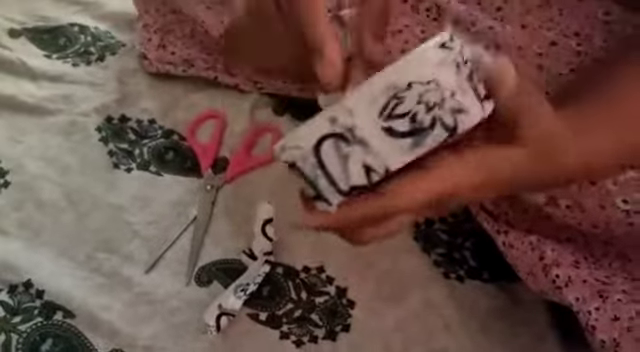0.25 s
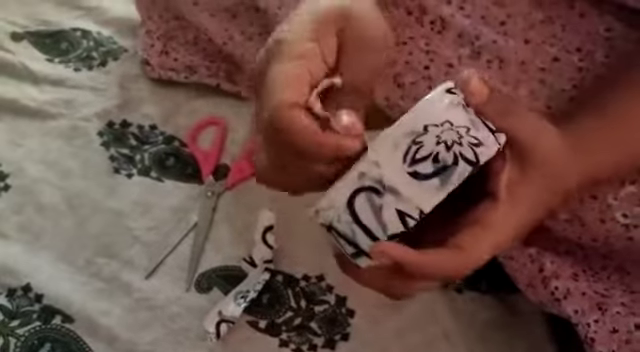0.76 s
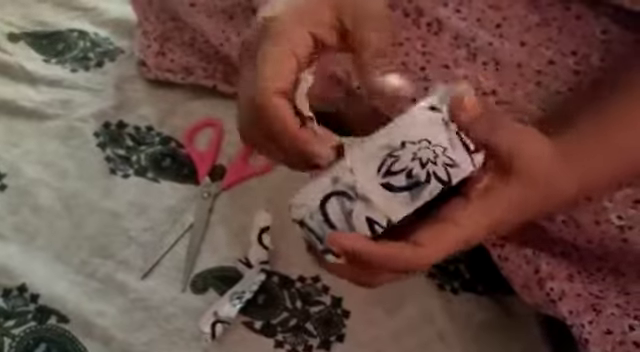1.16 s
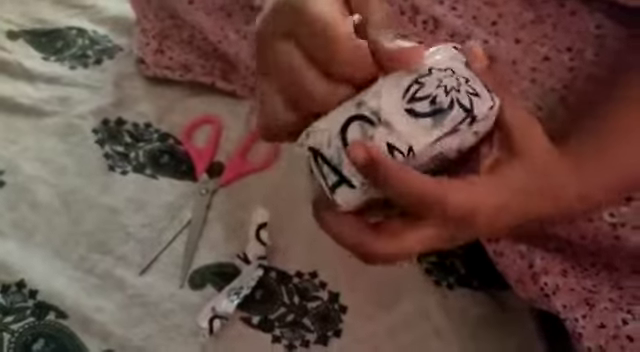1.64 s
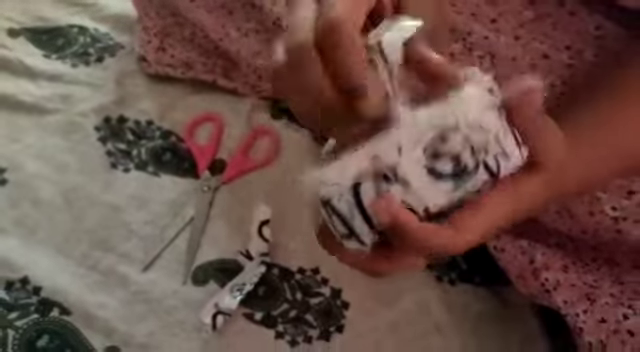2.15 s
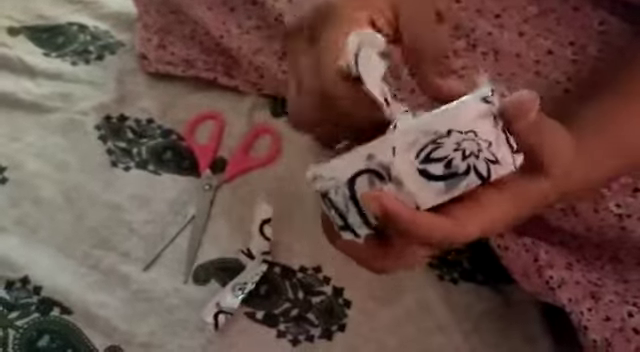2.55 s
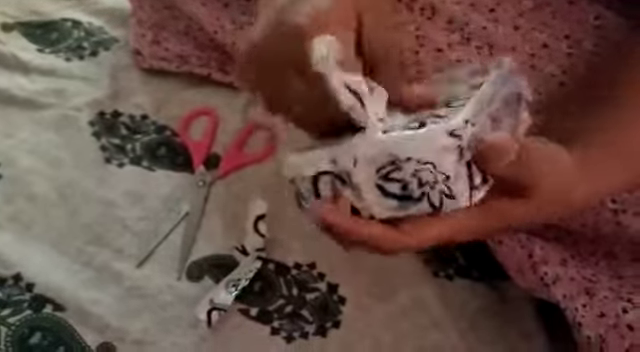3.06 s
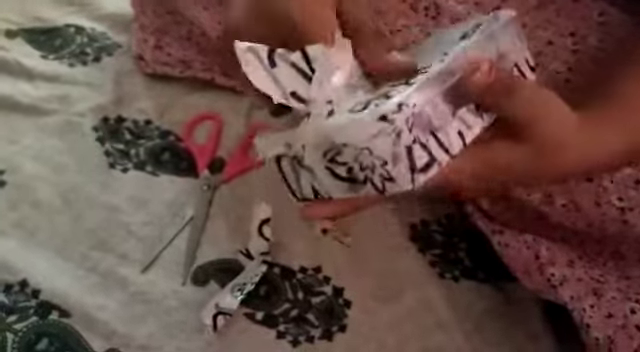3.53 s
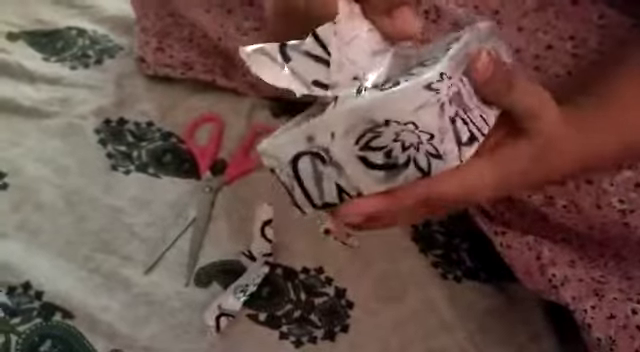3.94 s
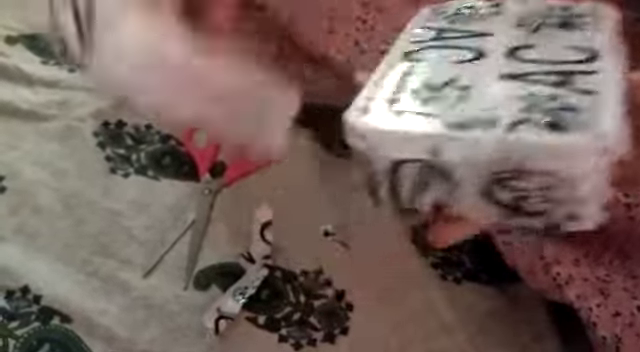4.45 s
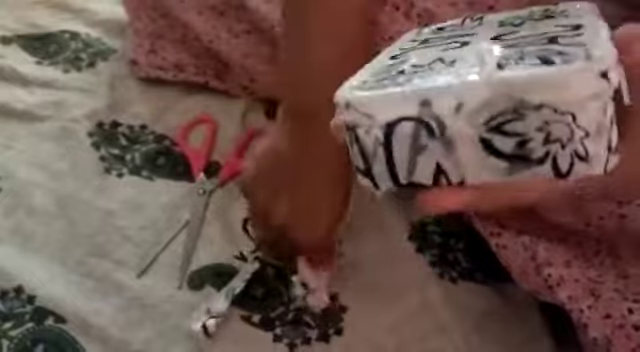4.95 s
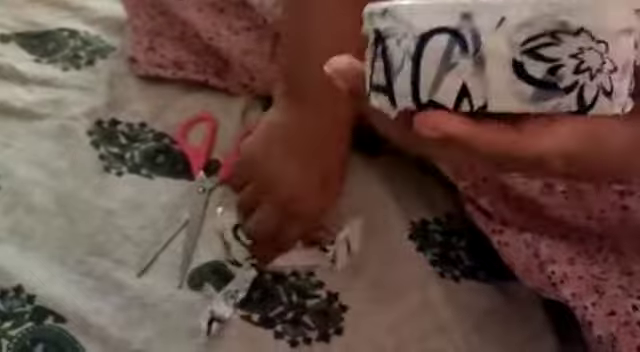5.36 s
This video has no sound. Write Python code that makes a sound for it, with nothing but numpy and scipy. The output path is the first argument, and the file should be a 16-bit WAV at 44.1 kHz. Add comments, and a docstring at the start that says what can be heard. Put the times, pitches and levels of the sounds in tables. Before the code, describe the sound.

A phone very close to the hands picks up stiff wrapping paper being torn from a small hollow box in a soft, quiet room. From 0 to 0.6 s there are only faint finger rubs, tiny creaks and soft hollow taps. Crisp snaps build from about 0.6 s into a loud crackling rip at 0.7-0.95 s, with blunt pressure pops stronger on the right. Quiet rubbing and small ticks follow from 1 to 2.4 s, with a barely audible thin whistle near 1.3-1.9 s. A single pop comes at 2.5 s, then a short, hard rip at 2.6-2.7 s. Light fumbling and dull knocks continue to 3.6 s. The longest burst, dense and bright, runs from 3.67 to 4.12 s, ending in its sharpest tear. After that, sparse ticks and gentle rustles, a little rub around 4.8-5.2 s, and low flickering room hiss to about 5.6 s.

```python
"""Paper wrap of a small box, picked at and torn by hand, close under a phone in a soft furnished room.
Creases, fibres and sliding fingers are noise bursts in the paper and knocks on the modes of the box.
Pressed panels ring as decaying sines; flips of the sheet are pressure jumps at the right port,
and the bass cut of the phone rings after them. Wall echoes and a short noise tail follow the paper;
below lie faint wavering tones and a quiet room noise that the phone's noise suppressor makes flicker."""
import sys
import numpy as np
from scipy import signal
from scipy.fft import rfft, irfft, next_fast_len
from scipy.io import wavfile

SR = 44100
rng = np.random.default_rng(int(sys.argv[2]) if len(sys.argv) > 2 else 0)


def transcribe(u):
    """Save the signal u as a 16-bit wav file named by the first command-line argument.

    u: samples, shape (n,) or (channels, n), limited to [-1, 1]; the rate is SR.
    q: integer samples, one column per channel.
    """
    v = np.clip(np.atleast_2d(u).T, -1, 1)
    q = np.round(v * 32767).astype(np.int16)
    wavfile.write(sys.argv[1], SR, q)


N = 246959

# crease snaps, burst energy: (time [s], treble left [dB], treble right [dB], box boom [dB])
SNAPS = [(.1277, -22, -14, -49), (.3279, -48, -48, -13.5), (.3881, -29, -25.5, -23), (.427, -26, -26, -30),
         (.5738, -16.5, -9.5, -16.5), (.6001, -5, -9, -17.5), (.696, -0.5, 1.5, -27),
         (.7032, -31.5, -16, -5), (.7239, -13, -0.5, -14), (.7363, 6, 6, -4.5), (.8136, 11, 9, -1.5),
         (.8165, -9, -13, -5.5), (.8799, 7, 4.5, 11.5), (.9031, 17, 3, 15.5), (.9181, -10, -16, 14),
         (.9304, 1, -15, 12), (1.1378, -15, -16.5, -37), (1.1472, -13.5, -19, -27), (1.2148, -9, -15, -13),
         (1.2274, -12.5, -23, -17), (1.3838, -14, -8, -29), (1.4353, -11.5, -10, -30),
         (1.6435, -22.5, -26, -23.5), (1.7, -28, -31, -13), (1.858, -28, -22.5, -48),
         (1.9472, -14, -12.5, -37), (2.073, -29, -13.5, -9), (2.1729, -18, -8.5, -48),
         (2.2221, -34, -24, -12.5), (2.2518, -18, -19, -17.5), (2.4921, -1, 4.5, -5),
         (2.5809, -14.5, -14, -16), (2.6163, -10, -20, -24.5), (2.6222, 4.5, 7, -3), (2.6319, -11, -5, -5),
         (2.6575, 6.5, 6.5, 14), (2.666, 13.5, -13, 5.5), (2.6685, 7, 4, 4), (2.6833, 10, 1, -1),
         (2.797, -29, -42, -13), (2.8585, -20, -18, -27), (2.9022, -16.5, -7, -11),
         (2.9101, -32, -13.5, -3.5), (2.934, -43, -40, -20), (3.1394, -21.5, -16.5, -24),
         (3.453, -17, -12.5, -8), (3.5007, -46, -45, -11.5), (3.5519, -46, -44, -12), (3.6, -25, -27, -17),
         (3.6664, -12.5, -10, -24), (3.6877, 5.5, 6, 8), (3.6987, 10, 6, 6), (3.712, -11.5, 16.5, 2),
         (3.7158, 7.5, -0.5, 6), (3.7199, 9.5, -6, -16.5), (3.7295, -3, -3, -17.5), (3.7909, 9, 5.5, 1),
         (3.8389, 4.5, 9, 3), (3.8538, 2, 2, -27.5), (3.8663, 1.5, 5, -17.5), (3.8733, -2.5, -4, -17.5),
         (3.9115, 2, 1, -8), (3.9459, -1, -6, -9.5), (3.9626, -7.5, 2, -7.5), (3.9798, -4.5, 0, -10.5),
         (4.032, 0, 7, -9), (4.056, -15, 5.5, -6), (4.0958, 9.5, 9.5, 7.5), (4.0979, 13, 3, 15.5),
         (4.104, -4, -2.5, -6), (4.11, 16, 2, 14), (4.1183, 13.5, -4.5, 9), (4.2488, -14, -6.5, -13.5),
         (4.3554, -33, -24.5, -35), (4.7818, -19, -17.5, -19), (4.8297, -44, -23, -10.5),
         (5.1824, -12.5, -19, -6.5), (5.5045, -29.5, -35, -23)]
# runs of tearing fibres, energy of a usual break: (start [s], end [s], treble left [dB],
# treble right [dB], box boom [dB], mids over their usual share [dB])
RIPS = [(0.89, 0.93, -28, -39, -19, -14), (2.615, 2.639, -29, -9.5, -6.5, -8.5),
        (2.658, 2.672, -5.5, -12, -6, 7), (2.897, 2.944, -57, -55, -21, 3),
        (3.698, 3.727, -2, -10, -3, 3.5), (4.095, 4.12, 7.5, -8.5, 4, 8)]
# sheet flips at the right port, before the bass cut:
# (time [s], pressure jump [full scale 1, sign = direction], loading time [ms])
FLIPS = [(.7369, 0.93, 2), (0.8168, 0.79, 1.5), (.88, -0.32, 0.78), (0.9037, 0.66, 1.1), (.906, .5, 0.36),
         (0.9184, 0.22, 1.7), (0.9308, -0.21, 0.89), (2.4932, 1.12, 1.13), (2.6595, -0.73, 2.6),
         (2.6687, 1.54, 0.53), (3.7, 0.12, 1.2), (3.7033, -0.89, 1.7), (3.7075, 1, 1.7),
         (3.7159, 0.67, 1.8), (3.7194, -0.32, 1.3), (3.729, -0.69, 1.1), (3.793, -0.73, 1.9),
         (3.839, 0.89, 2.8), (3.8541, .55, 1.1), (3.8664, .35, 0.73), (3.912, 0.16, 1.7),
         (4.0966, .95, 0.55), (4.104, .75, 4.9), (4.108, -0.55, 0.97), (4.1111, 0.5, 1.4),
         (4.12, 0.74, 0.46), (4.1232, -0.41, 1.2)]
# fingers sliding on paper, energy of a usual creak: (time [s], treble rustle [dB], low rub [dB])
RUSTLE = [(0, -47, -33.5), (.2, -39, -36), (.44, -51.5, -39), (.6, -37, -34.5), (1.05, -48, -45),
          (1.35, -42, -34), (1.46, -41, -28), (1.55, -44.5, -27.5), (1.7, -39, -41), (1.9, -59.5, -58),
          (2.149, -38.5, -29.5), (2.4, -44.5, -36), (2.85, -42, -42), (3.08, -39, -29),
          (3.321, -48.5, -55.5), (3.45, -42.5, -35.5), (3.9, -44, -40), (4.3, -39.5, -33), (4.56, -64, -53),
          (4.85, -37, -29.5), (5.34, -58.5, -45), (5.471, -52, -38), (5.6, -43, -35.5)]
# finger pads press a box panel: (time [s], peak before the ports [dB], panel pitch [Hz])
PRESSES = [(.134, -51.5, 466), (.325, -45, 666), (1.384, -51, 423), (1.447, -55, 406), (1.479, -47, 407),
           (1.511, -49, 465), (1.553, -47.5, 374), (2.124, -46, 300), (2.247, -50.5, 436),
           (2.934, -53, 700)]
# lid and cavity modes: (frequency [Hz], width [Hz], left [dB], right [dB])
BOX_MODES = [(166.4, 270, -6, -16.5), (324, 83, -10, -14.5), (416, 132, -1, -5), (603, 89, -1.5, -8),
             (708, 103, 0.5, -8.5), (940, 150, -7, -5.5)]
# colour of the two ports: (frequency [Hz], left [dB], right [dB])
PORTS = [(208, 4, 3), (725, 4, -0.5), (887, -0.5, -0.5), (1130, -8, -7.5), (1690, -2.5, -6), (2650, 4, -3),
         (3150, 2.5, -3), (4110, 5, -0.5), (5010, -4.5, -7.5), (5690, 2.5, 0), (6540, 9.5, 2.5),
         (6820, 4, 5), (7565, 1, 12.5), (8144, -25, -11.5)]
# hum spectrum before the ports: (frequency [Hz], relative density [dB per Hz], left-right likeness [0-1])
HUM = [(30, -8.5, 0.5), (58, 3, 0.6), (106, 2, 0.7), (149, 2.5, 0.98), (202, -5, 0.9), (430, 2, 1),
       (740, -12, 0.51), (1000, -9, 0), (1960, -11.5, .05), (2960, -17.5, 0.3), (3200, -14, 0.6),
       (4100, -19, .1), (5100, -12.5, 0.14), (7870, -20.5, 0.5)]
# faint wavering tones: (frequency [Hz], middle level [dB])
WHINES = [(1880, -79), (2600, -82.5), (3391, -76), (3800, -82.5)]
# thin tone that comes and goes: (time [s], middle level [dB])
WHISTLE = [(1.2, -120), (1.31, -67), (1.7, -72), (1.9, -82), (2.0, -120)]
# nearby walls: (delay [s], left [dB], right [dB])
ECHOES = [(.0085, -15, -23.5), (0.019, -23, -31.5), (.027, -21, -24.5)]
# noise tail of box boom, sheet mids, treble in turn: (t60 [s], left [dB], right [dB])
TAIL = [(0.35, -17.5, -19.5), (0.28, -11, -11.5), (0.22, -9, -19.5)]

HUM_DB, WHISTLE_HZ = -59.5, 4603
SHEET_HZ, TREBLE_HZ = (1100, 4700), (4700, 9000)
LOW_CUT_HZ, TOP_HZ = 106.25, 8000
MIDS_FROM_TREBLE, MIDS_DB = 0.57, -9  # sheet mids lie between treble and boom in dB, then this offset
RIPS_PER_S, CREAKS_PER_S, TICKS_PER_S = 1100, 640, 7.9
TICK_OVER_DB = 19.5  # ticks over creaks, treble only


def undb(db):
    """Amplitude of a dB level."""
    return 10 ** (np.asarray(db) / 20)


def band(x, edges_hz, order=3):
    """Steep band-pass."""
    sos = signal.butter(order, edges_hz, "bandpass", fs=SR, output="sos")
    return signal.sosfilt(sos, x)


def on_log_axis(points_hz, values, size):
    """Table values at the bins of a transform, joined over log frequency."""
    bins_hz = np.fft.rfftfreq(size, 1 / SR)
    return np.interp(np.log(bins_hz + 1), np.log(points_hz), values)


def causal(points_hz, db, size=1024):
    """Minimum-phase response of a dB curve, by folding its cepstrum."""
    cepstrum = irfft(on_log_axis(points_hz, db, size) * np.log(10) / 20)
    cepstrum[1:size // 2] *= 2
    cepstrum[size // 2 + 1:] = 0
    return irfft(np.exp(rfft(cepstrum)))


def walk(points_per_s, count=400):
    """Random levels of unit spread joined by straight lines."""
    return np.interp(np.arange(N) / SR * points_per_s, np.arange(count), rng.standard_normal(count))


def unit_energy(x):
    """Scale each row to energy 1."""
    return x / np.sqrt(np.sum(x ** 2, axis=1))[:, None]


def start_samples(s):
    """Sample index of each time, held inside the scene."""
    return np.clip((s * SR).astype(int), 0, N - 1)


def bursts(s, db, decay_s, rise_s=0.00038, size=512):
    """A short noise burst of fixed energy at each time."""
    t = np.arange(size) / SR
    envelope = np.exp(-t / decay_s) * (1 - np.exp(-t / rise_s))
    noise = unit_energy(rng.standard_normal((len(s), size)) * envelope)
    out = np.zeros(N + size)
    np.add.at(out, start_samples(s)[:, None] + np.arange(size), noise * undb(db)[:, None])
    return out[:N]


def knocks(s, db):
    """One push or pull on the box at each time."""
    out = np.zeros(N)
    np.add.at(out, start_samples(s), undb(db) * np.sign(rng.standard_normal(len(s))))
    return out


def crackle(per_s, scatter_db, count):
    """Break times with random waits, and skewed sizes in dB: a few far above the rest, capped."""
    wait, size = -np.log(rng.random((count, 2))).T
    return np.cumsum(wait) / per_s, scatter_db * (np.minimum(size, 2.5) - 1)


def hum(patchy_db=3.0, drift_db=1.72, count=16):
    """Quiet room noise, alike at both ports in the bass; the phone's noise suppressor makes
    each band flicker and drift alone."""
    hz, db, likeness = np.transpose(HUM)
    size = next_fast_len(N)
    gain = undb(on_log_axis(hz, db, size))
    alike = np.clip(on_log_axis(hz, likeness, size), 0, 1)
    mid, side = rfft(rng.standard_normal((2, size))) * gain * np.sqrt([1 + alike, 1 - alike])
    both = np.array([mid + side, mid - side])
    centres_hz = np.geomspace(50, 9000, count)
    noise = 0
    for share in np.eye(count):  # overlapping bands that sum to one
        part = irfft(both * on_log_axis(centres_hz, share, size), size)[:, :N]
        noise = noise + part * undb(patchy_db * walk(10.0) + drift_db * walk(2.22))
    return noise * undb(HUM_DB) / np.std(noise)


def whines():
    """Sines whose pitch and level waver at random; the whistle also follows its own level table."""
    tones = [(hz, db + 3.2 * walk(9.)) for hz, db in WHINES]
    whistle_db = np.interp(np.arange(N) / SR, *np.transpose(WHISTLE))
    tones.append((WHISTLE_HZ, whistle_db + 4.0 * walk(40.)))
    out = 0
    for hz, db in tones:
        phase = 2 * np.pi * np.cumsum(hz + 6.5 * walk(37.0)) / SR
        out = out + undb(db) * np.sin(phase + np.array([[0], [1]]))  # right leads by 1 rad
    return out


def creaks(per_s, over_db, lean_db, count):
    """Random creaks under the sliding fingers, in the columns of SNAPS."""
    s, size_db = crackle(per_s, 1.4, count=count)
    t, treble_db, low_db = np.transpose(RUSTLE)
    size_db = np.where(s < N / SR, size_db, -np.inf)
    treble = np.interp(s, t, treble_db) + size_db + over_db
    low = np.interp(s, t, low_db) + size_db
    side_db = 1.5 * rng.standard_normal(len(s)) + lean_db
    return np.column_stack([s, treble + side_db, treble - side_db, low])


def box(pushes, contact_hz=1150.0):
    """Box modes as each port hears them; the soft card rounds each push."""
    soft = signal.sosfilt(signal.butter(2, contact_hz, fs=SR, output="sos"), pushes)
    out = 0
    for hz, width_hz, *port_db in BOX_MODES:
        mode = signal.lfilter(*signal.iirpeak(hz, hz / width_hz, SR), soft)
        out = out + undb(port_db)[:, None] * mode
    return out


def room(ranges, size=22050):
    """Smeared wall echoes and a noise tail that builds up and dies; both reach the left port better."""
    t = np.arange(size) / SR
    out = 0
    for x, (t60_s, *tail_db) in zip(ranges, TAIL):
        envelope = np.exp(-np.log(1000) * t / t60_s) * (1 - np.exp(-t / 0.0027))
        response = unit_energy(rng.standard_normal((2, size)) * envelope) * undb(tail_db)[:, None]
        for delay_s, *echo_db in ECHOES:
            smear = rng.standard_normal((2, size)) * np.exp(-((t - delay_s) / 0.0012) ** 2)
            response = response + unit_energy(smear) * undb(echo_db)[:, None]
        source = x.sum(axis=0, keepdims=True)
        out = out + signal.fftconvolve(source, response, axes=1)[:, :N]
    return out


def presses(t60_s=0.053, right_db=0.0, lag_s=.00015, size=4096):
    """Panels ring as soft-edged decaying sines, a little later on the right."""
    t = np.arange(size) / SR
    envelope = np.exp(-np.log(1000) * t / t60_s) * (1 - np.exp(-t / 0.00038))
    out = np.zeros(N + size)
    for s, db, hz in PRESSES:
        ring = np.sin(2 * np.pi * hz * t) * envelope
        first = int(s * SR)
        out[first:first + size] += undb(db) * ring / np.max(ring)
    right = undb(right_db) * np.roll(out, int(lag_s * SR))
    return np.array([out[:N], right[:N]])


def flips(relax_s=0.015, load_share=0.93, edge_s=0.0002, left_db=-44.0):
    """Pressure builds one way as the sheet loads, then jumps back and a little over as it flips."""
    lead = SR // 50
    t = (np.arange(SR // 10) - lead) / SR
    after = .5 + .5 * np.tanh(t / edge_s)
    relax = (1 - load_share) * after * np.exp(-np.abs(t) / relax_s)
    right = np.zeros(N)
    for s, jump, load_ms in FLIPS:
        first = int(s * SR) - lead
        load = load_share * (1 - after) * np.exp(-1000 * np.abs(t) / load_ms)
        right[first:first + len(t)] += jump * (relax - load)
    return np.array([undb(left_db) * right, right])


def fibres():
    """Random breaks along each rip, silent past its end; columns of SNAPS plus extra mids."""
    rows = []
    for start_s, end_s, *range_db, extra_db in RIPS:
        wait_s, size_db = crackle(RIPS_PER_S, 3.6, count=100)
        s = start_s + wait_s
        size_db = np.where(s < end_s, size_db, -np.inf)
        rows.append(np.column_stack([s, np.add.outer(size_db, range_db), np.full(len(s), extra_db)]))
    return np.vstack(rows)


def paper():
    """Every break sounds in three ranges (box boom, sheet mids, treble), each left and right."""
    fine = creaks(CREAKS_PER_S, 0, lean_db=0.1, count=5000)
    ticks = creaks(TICKS_PER_S, TICK_OVER_DB, lean_db=0.5, count=100)
    plain = np.pad(np.vstack([SNAPS, fine, ticks]), [(0, 0), (0, 1)])  # no extra mids
    s, left_db, right_db, boom_db, extra_db = np.vstack([plain, fibres()]).T

    treble_db = np.maximum(left_db, right_db)
    mid_db = MIDS_FROM_TREBLE * treble_db + (1 - MIDS_FROM_TREBLE) * boom_db + MIDS_DB + extra_db
    lean_db = 0.37 * np.nan_to_num(right_db - left_db)
    late = s + .0004  # the left port is further from the hands

    shared = knocks(s, boom_db)
    own_right = knocks(s + 0.001357, boom_db + 7.5)
    boom = np.array([shared, 1.65 * shared + own_right])  # partly alike at both ports
    mids = np.array([bursts(late, mid_db, 0.0018), bursts(s, mid_db + lean_db, 0.00022)])
    treble = np.array([bursts(late, left_db, 0.0018), bursts(s, right_db, 0.00094)])
    return box(boom) + presses(), band(mids, SHEET_HZ), band(treble, TREBLE_HZ)


def scene():
    """Paper, room and hum pass the coloured ports; the flips push the ports directly."""
    ranges = paper()
    air = sum(ranges) + room(ranges) + hum() + whines()
    hz, *port_db = np.transpose(PORTS)
    ports = np.array([causal(hz, db) for db in port_db])
    return signal.fftconvolve(air, ports, axes=1)[:, :N] + flips()


def record(dry):
    """A sharp shelf cuts the bass and rings after every jolt; peaks are rounded and the top is cut."""
    shelf = signal.ellip(6, .011, 8.43, LOW_CUT_HZ, "highpass", fs=SR, output="sos")
    coupling = signal.butter(1, 18., "highpass", fs=SR, output="sos")
    low_cut = signal.sosfilt(np.vstack([coupling, shelf]), dry)
    rounded = .78 * np.tanh(low_cut / .78)
    top_cut = signal.cheby1(8, .5, TOP_HZ, fs=SR, output="sos")
    return signal.sosfilt(top_cut, rounded)


dry = scene()
out = record(dry)
transcribe(out)
```